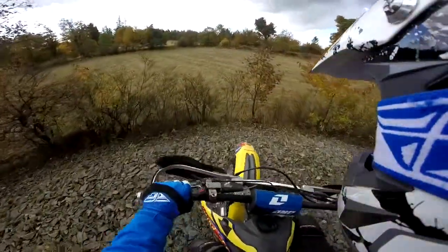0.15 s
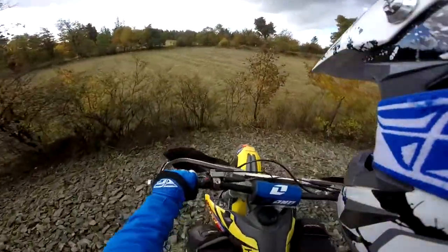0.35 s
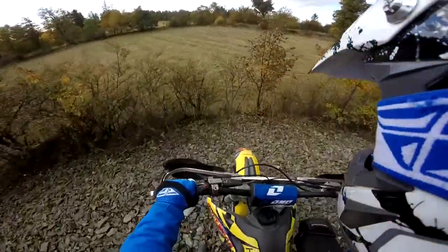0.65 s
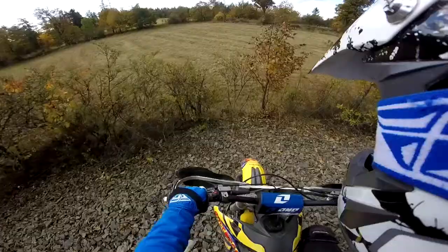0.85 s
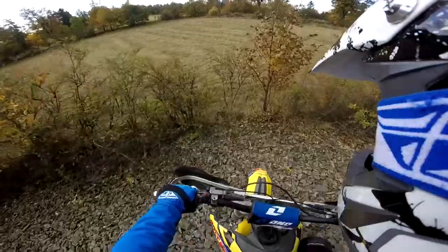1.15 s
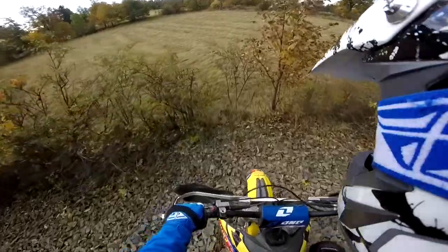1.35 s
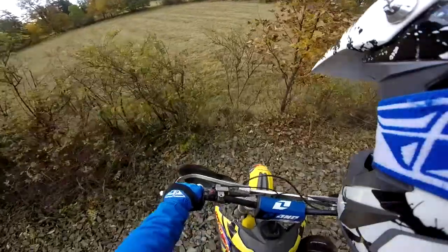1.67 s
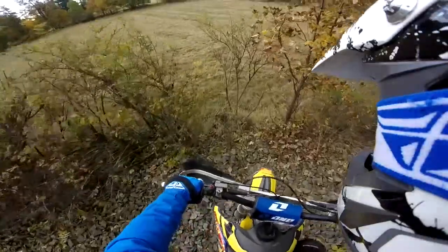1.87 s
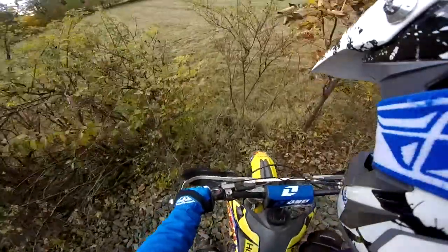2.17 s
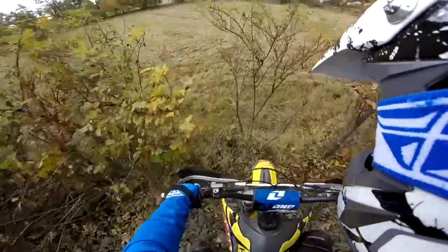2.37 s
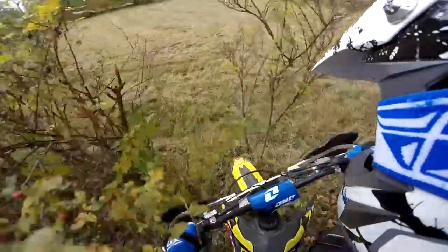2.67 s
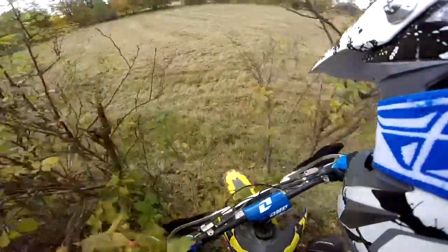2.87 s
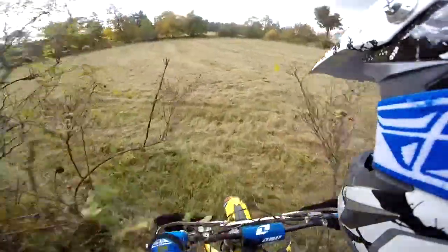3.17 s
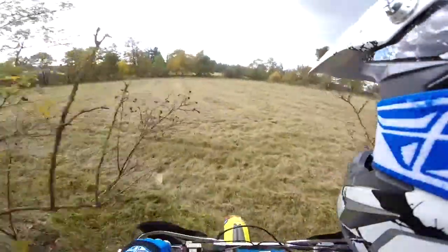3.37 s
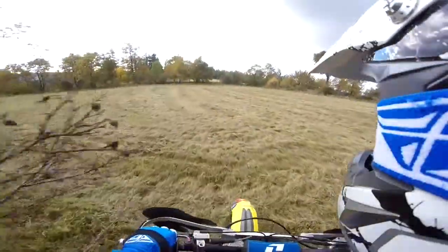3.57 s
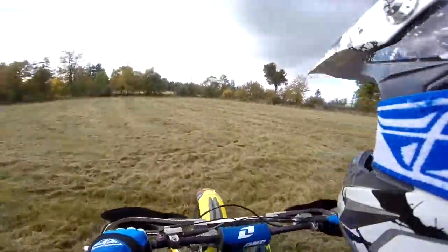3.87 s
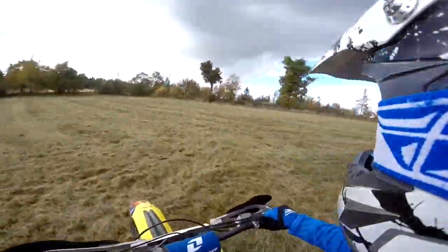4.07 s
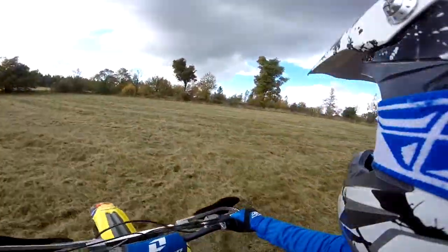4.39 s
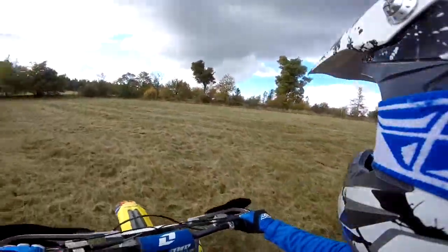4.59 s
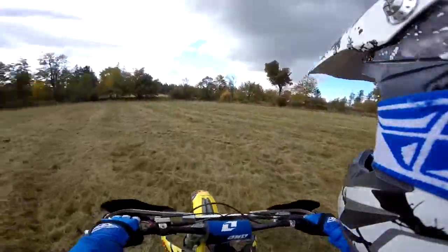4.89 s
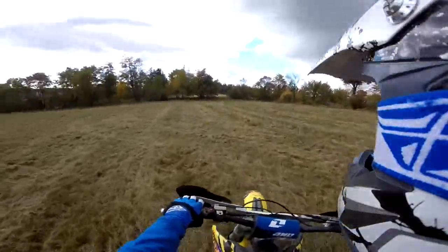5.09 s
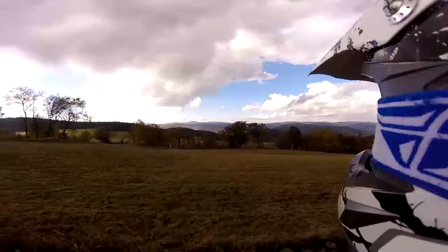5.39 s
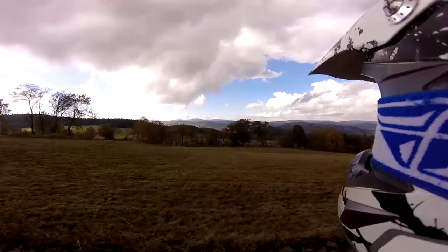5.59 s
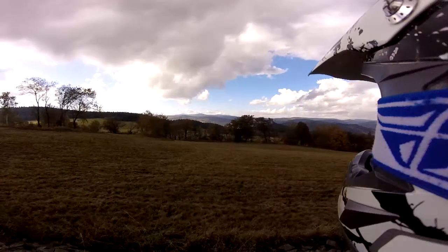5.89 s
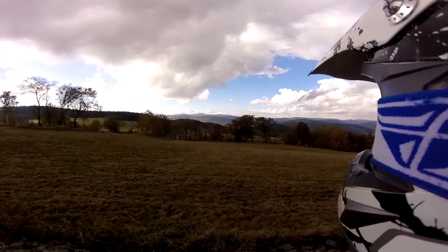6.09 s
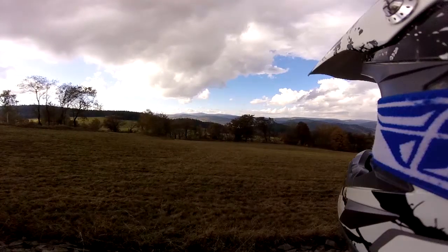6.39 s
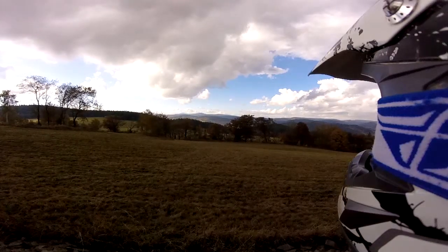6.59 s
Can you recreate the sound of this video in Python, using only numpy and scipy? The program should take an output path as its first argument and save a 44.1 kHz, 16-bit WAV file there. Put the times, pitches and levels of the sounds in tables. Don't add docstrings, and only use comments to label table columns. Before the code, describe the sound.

A two-stroke dirt bike idles with uneven popping over crunching stones and whipping twigs, revs up hard, then cuts abruptly to faint grass hiss and soft wind.

```python
import sys
import numpy as np
from scipy import signal
from scipy.fft import rfft, irfft
from scipy.io import wavfile
from scipy.ndimage import uniform_filter1d

SR = 44100
rng = np.random.default_rng(int(sys.argv[2]) if len(sys.argv) > 2 else 0)


def log_audio(samples):
    frames = np.atleast_2d(samples).T
    limited = np.clip(frames, -1, 1)
    pcm = np.round(limited * 32767).astype(np.int16)
    wavfile.write(sys.argv[1], SR, pcm)


def natural_amplitude(level_db):
    exponent = np.asarray(level_db, float) / 20
    return 10 ** exponent


N = 297521
T = np.arange(N) / SR

# start_s, load (0 idle to 1 full)
THROTTLE = [
    (0, 0.),
    (3.5, 0.05),
    (3.7, 0.86),
    (3.95, 0.58),
    (4.5, 0.9),
    (4.8, 0.86),
    (5.36, 0.68),
]


def throttle():
    return np.clip(np.interp(T, *np.transpose(THROTTLE)), 0, 1)


# start_s, speed_turns_per_s
SPEED = [(0.0, 22.01), (0.457, 21.73), (0.732, 23.97), (0.941, 22.68), (1.288, 21.93), (1.749, 23.13),
         (2.299, 21.18), (2.932, 22.07), (3.284, 22.25), (3.554, 20.95), (3.644, 30.06), (3.75, 38.46),
         (4.0, 35.84), (4.443, 27.59), (4.728, 29.41), (4.789, 32.57), (4.998, 31.88), (5.4, 36.37)]


def crank_speed(at_s):
    return np.interp(at_s, *np.transpose(SPEED))


def turning():
    s = T - .05
    turns = np.cumsum(crank_speed(s)) / SR
    turns_at_start = .833
    return s, turns - np.interp(0, s, turns) + turns_at_start


def crank(lead):
    s, turns = turning()
    angle = np.interp(T + lead, s, turns)
    turn = angle.astype(int)
    return turn, angle - turn, T - np.interp(turn, turns, s)


# first_s, last_s, share of a full burn (below 0 sucks the pipe back)
SKIPS = [(.008, .008, .65), (.053, .053, -.3), (.144, .144, .6), (.19, .281, .4), (.465, .465, .4),
         (.554, .642, -.25), (.77, 1.031, -.12), (1.12, 1.21, .16), (1.3, 1.481, -.4), (1.391, 1.391, .5),
         (1.613, 1.7, .4), (1.744, 1.832, -.46), (1.919, 2.008, .26), (2.054, 2.054, .22),
         (2.146, 2.239, -.3), (2.332, 2.426, .2), (2.519, 2.796, -.35), (2.612, 2.612, .45),
         (2.932, 3.023, .4), (3.113, 3.113, -.35), (3.204, 3.478, .5), (3.248, 3.34, .47)]


def burns():
    scatter = .12
    chance = rng.standard_normal(200)
    share = .95 * natural_amplitude(.7 * chance)
    for first_s, last_s, weak in SKIPS:
        first, last = np.round(np.interp([first_s, last_s], *turning())).astype(int)
        share[first:last + 1:2] = weak + scatter * chance[first:last + 1:2]
    return share


# pitch_hz, width_hz, level_db
PIPE_COOL = [(328, 121, 8.5), (165.4, 49, 0.7)]
PIPE_HOT = [(312.3, 53, 9), (168.4, 172, 4), (247, 17, 2.5), (488, 220, 0), (652, 48, -4), (76, 19, -8.5)]
# pitch_hz, width_hz, level_db, delay_s
LUG_RING = [(290, 36, 9.5, 0.0039), (656, 70, 3, 0.00794), (500, 39, 1.5, 0.00604)]


def exhaust(load):
    turn, _, since = crank(.004)
    since = since - .0003 * (1.15 - load) * rng.standard_normal(200)[turn]
    burn = -burns()[turn]

    def pulse(width_s, late_s=0):
        return burn * np.exp(-((since - late_s) / width_s) ** 2)

    cool = modes(pulse(0.00091), PIPE_COOL)
    back = 0.65 * band(pulse(0.0017, .0071), 85.0, 290.0)
    hot = modes(pulse(0.00067), PIPE_HOT)
    sharp = pulse(0.00048)
    lug = 0
    for hz, width_hz, db, delay_s in LUG_RING:
        lug = lug + natural_amplitude(db) * band(np.roll(sharp, int(delay_s * SR)), hz, width_hz)
    lugging = np.clip((33.5 - crank_speed(T)) / 5.5, 0, 1)
    return (1 - load) * (cool + back) + load * hot + load ** 2 * lugging * lug


# pitch_hz, width_hz, level_db
BOX_COOL = [(65, 49, 1), (129.4, 44, 1.5), (250, 80, 1.5)]
BOX_HOT = [(60, 40, -2), (151, 140, -20.5)]


def intake(turn, angle, load):
    shut = .277 + .006 * (1.2 - load) * rng.standard_normal(200)[turn]
    strength = natural_amplitude(2. * (1.3 - load) * rng.standard_normal(200)[turn])
    flow = (angle / shut) ** 2.8 * (angle < shut) * strength
    flow = uniform_filter1d(flow, size=32)
    return (1 - load) * modes(flow, BOX_COOL) + load * modes(flow, BOX_HOT)


def pipe_meets_box(engine, load):
    fast = np.clip((crank_speed(T) - 28) / (38 - 28), 0, 1)
    slow_notch = band(engine, 88., 31)
    fast_notch = band(engine, 109, 31)
    return engine - 0.87 * load * ((1 - fast) * slow_notch + fast * fast_notch)


# pitch_hz, level_db (per Hz)
CLATTER = [(210, -8), (350, -4.5), (417, -12), (496, -8), (581, -10.5), (660, -11), (798, -15), (1110, -27),
           (1390, -21), (1660, -14.5), (2460, -27), (3120, -25.5), (8090, -54), (13900, -81),
           (15500, -85.5)]
# pitch_hz, width_hz, idle_db, load_db
CASING = [(822, 96, -50, -49.5), (608, 90, -48, -30), (1102, 190, -63.5, -33), (1750, 430, -39.5, -57),
          (3070, 183, -39, -46.5)]
# pitch_hz, width_hz, level_db
FINS = [(5030, 140, -61), (6280, 170, -57), (8240, 450, -64.5), (11000, 900, -70.5), (13000, 2100, -74)]


def clatter(angle, load):
    idle_db, full_db = -28, -28.5
    repeat_idle, repeat_load = .3, .55
    gate = 1 + 0.93 * np.exp(-angle / 0.38)
    fresh = rng.standard_normal(N) * sizes(2.42)
    same = fresh[(angle * 1500).astype(int)]
    share = repeat_idle + load * (repeat_load - repeat_idle)
    noise = gate * (np.sqrt(share) * same + np.sqrt(1 - share) * fresh)
    db = idle_db + load * (full_db - idle_db)
    out = level(colour(noise, CLATTER), 6.02) * natural_amplitude(db + 0.91 * walk(30))
    for hz, width_hz, hum_idle_db, hum_load_db in CASING:
        hum_db = hum_idle_db + load * (hum_load_db - hum_idle_db)
        out = out + level(band_twice(noise, hz, width_hz), 0) * natural_amplitude(hum_db)
    for hz, width_hz, fin_db in FINS:
        out = out + level(band_twice(fresh, hz, width_hz), fin_db)
    return out * natural_amplitude(-8.5 * np.maximum(T - 4.92, 0))


# start_s, hold_s, level_db
RATTLE_SPELL = [
    (4.77, 0.23, -48),
]


def rattle(turn, angle):
    hit = .56 + .03 * rng.standard_normal(200)[turn]
    after = angle - hit
    gate = (angle > hit) * (np.exp(-after / 0.062) + 0.81 * np.exp(-after / 0.48))
    share = rng.random(200)[turn]
    low = band_twice(rng.standard_normal(N), 6200., 2500.)
    high = band_twice(rng.standard_normal(N), 8300., 2500.)
    spell_db = swells(RATTLE_SPELL, attack_s=0.056, t60_s=.4, rest_db=-85)
    return level(gate * (share * low + (1 - share) * high), 0) * natural_amplitude(spell_db)


# start_s, crunch_db
STONES = [(0, -33), (.07, -54), (.13, -45.5), (.35, -39), (.5, -49), (1.0, -43.5), (1.17, -45.5),
          (1.48, -38.5), (2.15, -34.5), (2.3, -36.5), (2.75, -38.5), (3.2, -36), (3.45, -42.5), (3.9, -58),
          (4.23, -59.5), (4.5, -48.5), (4.95, -62), (5.3, -70.5)]
# pitch_hz, level_db (per Hz)
STONE_COLOUR = [(760, -8.5), (1300, -31), (1830, 4), (2640, -4), (3170, -1), (4160, -7.5), (4910, -5),
                (6030, -5), (7060, -13), (8430, -14.5), (9250, -29.5), (10800, -26.5), (12000, -45.5),
                (15600, -77.5), (22000, -120)]


def stones():
    return crunch(np.interp(T, *np.transpose(STONES)), STONE_COLOUR, 5.04, 5.1)


# start_s, dull_peak_db, dull_hz, bright_peak_db
KNOCKS = [(0.0718, -40, 1450, -32), (0.1223, -12, 2200, -60), (0.1583, -16, 1620, -41),
          (0.198, -19, 1940, -25.5), (0.2432, -18.5, 1800, -24.5), (0.398, -15.5, 1680, -44),
          (0.7742, -23, 1660, -54), (0.8736, -21.5, 1680, -47), (1.2753, -26, 2340, -38),
          (1.3975, -15, 2150, -44), (1.6155, -20.5, 1920, -25.5), (1.6628, -19, 1800, -24.5),
          (2.3578, -15.5, 3060, -33), (2.4996, -21, 1850, -20.5), (2.704, -15, 1930, -21.5),
          (2.7533, -18, 1750, -23.5), (2.7789, -9, 3200, -58), (2.9328, -16, 2860, -39),
          (2.955, -13.5, 2250, -40), (3.0425, -12.5, 2780, -46.5), (3.0912, -15, 1890, -26.5),
          (3.1148, -15, 2000, -38.5), (3.1819, -26, 1170, -11.5), (3.1852, -5, 1730, -25),
          (3.1944, -4.5, 3130, -19), (3.2014, -9, 2080, -31.5), (3.215, -7, 1950, -20.5),
          (3.491, -21.5, 2020, -19.5), (3.5494, -35, 1830, -35.5), (3.812, -36.5, 1610, -44.5)]


def knocks():
    out, t = np.zeros(N), T[:4000]
    shape = np.exp(-np.log(1000) * t / 0.04) * (1 - np.exp(-t / 0.00044))
    for s, dull_db, hz, bright_db in KNOCKS:
        noise = rng.standard_normal(4000) * shape
        bright_hz = 5700. * (.9 + .2 * rng.random())
        dull = band(band(noise, hz, 0.28 * hz), hz, 2.0 * hz)
        bright = band(band(noise, bright_hz, .5 * bright_hz), bright_hz, 0.21 * bright_hz)
        i = int(s * SR)
        out[i:i + 4000] += natural_amplitude(dull_db) * dull / np.abs(dull).max()
        out[i:i + 4000] += natural_amplitude(bright_db) * bright / np.abs(bright).max()
    return out


# start_s, peak_db, pitch_hz, t60_s
THUMPS = [
    (2.78, -19.5, 960, 0.0074),
    (2.935, -17.5, 1200, .03),
    (2.952, -19, 1280, 0.025),
    (3.043, -9, 664, 0.04),
    (3.192, -7.5, 1080, 0.021),
    (3.198, -7.5, 538, 0.11),
    (3.205, -9.5, 810, 0.037),
    (3.215, -14, 959, .03),
]


def thumps():
    out, t = np.zeros(N), T[:6000]
    for s, db, hz, t60_s in THUMPS:
        push = rng.standard_normal(6000) * np.exp(-t / 0.00089)
        ring = band(band(push, hz, 1.97 / max(t60_s, .01)), hz, hz)
        i = int(s * SR)
        out[i:i + 6000] += natural_amplitude(db) * ring / np.abs(ring).max()
    return out


# start_s, hold_s, level_db
BRUSHES = [(0, .01, -57.5), (.12, 0.13, -59), (.27, 0.082, -54), (.52, 0.018, -60), (1.18, .03, -62.5),
           (1.42, 1.2, -59), (2.33, 0.27, -56), (2.62, .9, -49), (2.7, .01, -48.5), (3.17, 0.046, -45.5),
           (3.49, 0.01, -43), (3.55, 0.27, -55.5), (4.86, 0.17, -62)]
# pitch_hz, level_db (per Hz)
LEAF_COLOUR = [(4120, -38), (7000, -3), (8330, -5), (9470, -11.5), (10900, -9.5), (13100, -16.5),
               (14200, -23.5), (14800, -21.5), (15600, -21)]


def leaves():
    brush_db = swells(BRUSHES, attack_s=0.0069, t60_s=.35, rest_db=-73.5)
    return crunch(brush_db, LEAF_COLOUR, 4.3, 8.1)


def wind(db, hz):
    rumble = signal.lfilter(*signal.butter(2, [0.18 * hz, hz], "band", fs=SR), rng.standard_normal(N))
    return level(rumble, 0) * natural_amplitude(db + 1.5 * walk(18))


# pitch_hz, level_db (per Hz)
FIELD = [(59, -26), (100, -7), (196, -8.5), (394, -11), (497, -10.5), (808, -15), (2000, -19),
         (12800, -37.5), (14200, -47.5), (15500, -39.5)]
# start_s, hold_s, level_db
GUSTS = [
    (5.55, 0.2, -48),
    (5.78, 0.062, -42),
    (5.94, 0.027, -39.5),
    (6.0, .05, -50),
    (6.08, .03, -40.5),
    (6.15, 0.019, -54),
    (6.25, 0.027, -45),
    (6.32, 0.023, -57),
]


def field():
    hiss = level(colour(rng.standard_normal(N), FIELD), -57.5) * natural_amplitude(0.47 * walk(2.8))
    gust_db = swells(GUSTS, attack_s=0.013, t60_s=0.23, rest_db=-55.5)
    return hiss + wind(gust_db, 46.0)


def crunch(db, points, top_db, grain_db):
    grains = rng.standard_normal(N) * sizes(grain_db) * natural_amplitude(2. * walk(45))
    return level(colour(grains, points), top_db) * natural_amplitude(db)


def sizes(spread_db):
    return natural_amplitude(spread_db * np.minimum(rng.exponential(size=N), 5))


def swells(rows, attack_s, t60_s, rest_db):
    power = natural_amplitude(rest_db) ** 2 + 0 * T
    for s, hold_s, db in rows:
        rise = np.clip((T - s) / attack_s, 0, 1)
        fall = natural_amplitude(-60 * np.maximum(T - s - attack_s - hold_s, 0) / t60_s)
        power = power + (natural_amplitude(db) * rise * fall) ** 2
    return 10 * np.log10(power)


def walk(rate):
    k = int(SR / rate)
    held = rng.standard_normal(N)[np.arange(N) // k]
    return 1.12 * uniform_filter1d(uniform_filter1d(held, k), k)


def level(x, db):
    return x * natural_amplitude(db) / np.sqrt(np.mean(x ** 2))


def colour(x, points):
    hz, db = np.transpose(points)
    grid = np.maximum(np.fft.rfftfreq(2048, 1 / SR), 1)
    cep = irfft(np.interp(np.log(grid), np.log(hz), db) * np.log(10) / 20)
    cep[1:1024] *= 2
    cep[1025:] = 0
    return signal.fftconvolve(x, irfft(np.exp(rfft(cep))))[:N]


def band(x, hz, width_hz):
    return signal.lfilter(*signal.iirpeak(min(hz, .45 * SR), hz / width_hz, fs=SR), x)


def band_twice(x, hz, width_hz):
    return band(band(x, hz, width_hz), hz, width_hz)


def modes(x, table):
    return sum(natural_amplitude(db) * band(x, hz, width_hz) for hz, width_hz, db in table)


def scene():
    turn, angle, _ = crank(0)
    load = throttle()
    engine = pipe_meets_box(exhaust(load) + intake(turn, angle, load), load)
    ride = engine + clatter(angle, load) + rattle(turn, angle)
    ride = ride + stones() + knocks() + thumps() + leaves() + wind(-32.0, 170.0)
    riding = np.clip((5.3612 - T) / .003, 0, 1)
    return (riding * ride + (1 - riding) * field())[None]


def low_pass(x):
    return signal.sosfilt(signal.butter(12, 15310, fs=SR, output="sos"), x)


def record(dry):
    thin = signal.lfilter(*signal.butter(1, 24., "high", fs=SR), dry)
    return low_pass(np.tanh(0.81 * thin) / 1.031)


dry = scene()
out = record(dry)
log_audio(out)
```